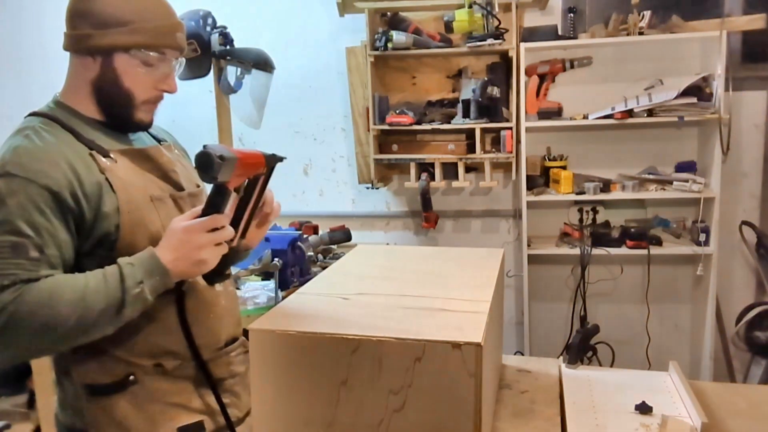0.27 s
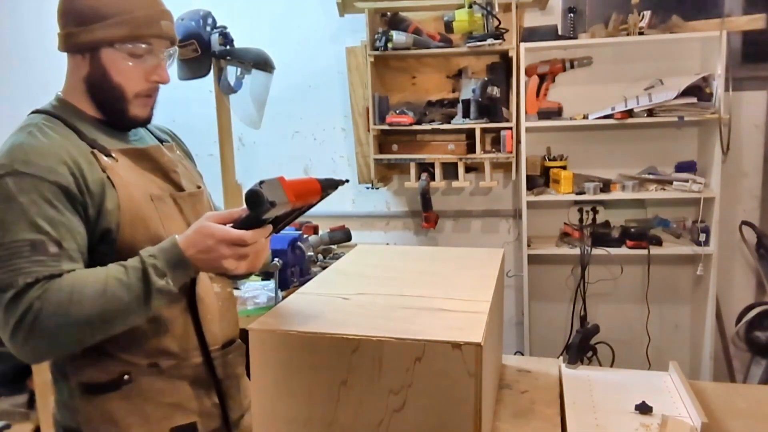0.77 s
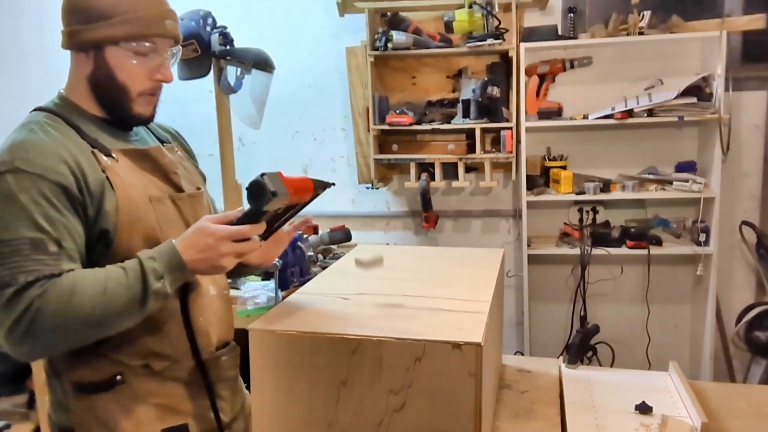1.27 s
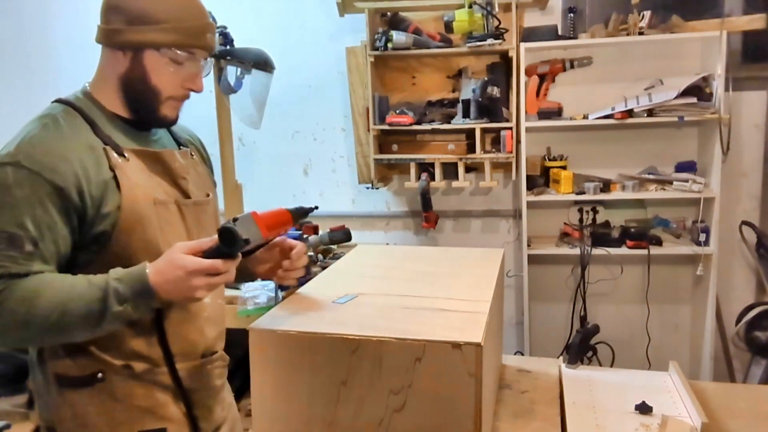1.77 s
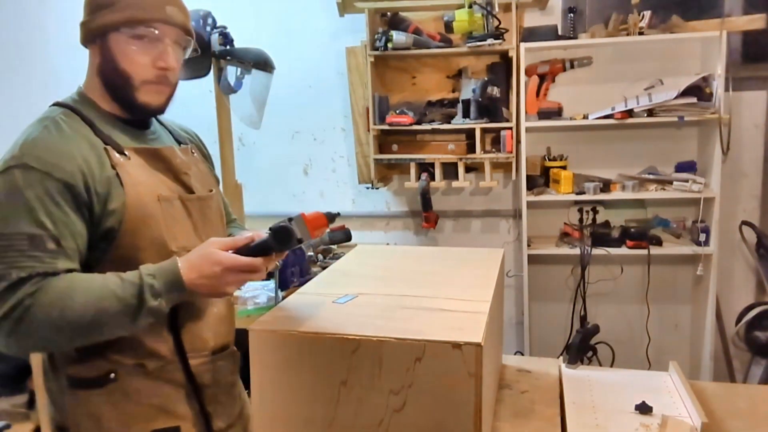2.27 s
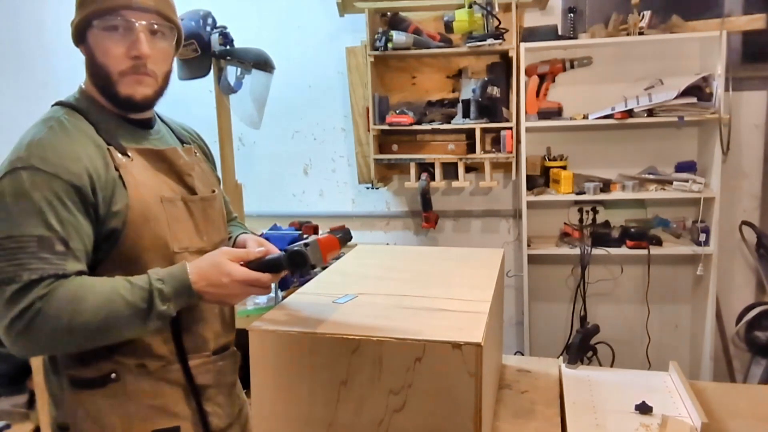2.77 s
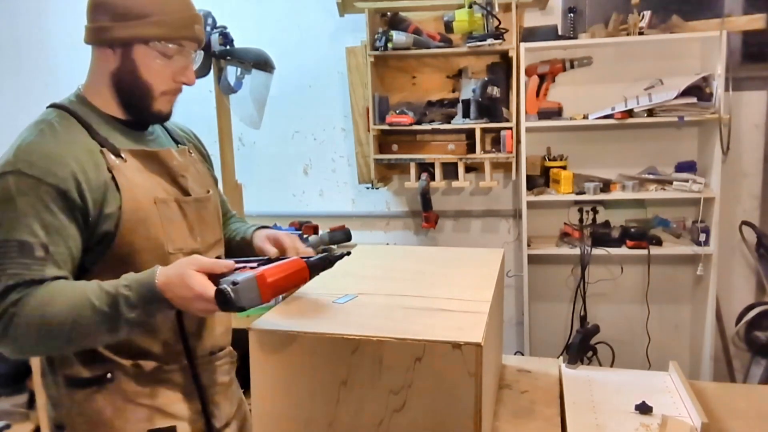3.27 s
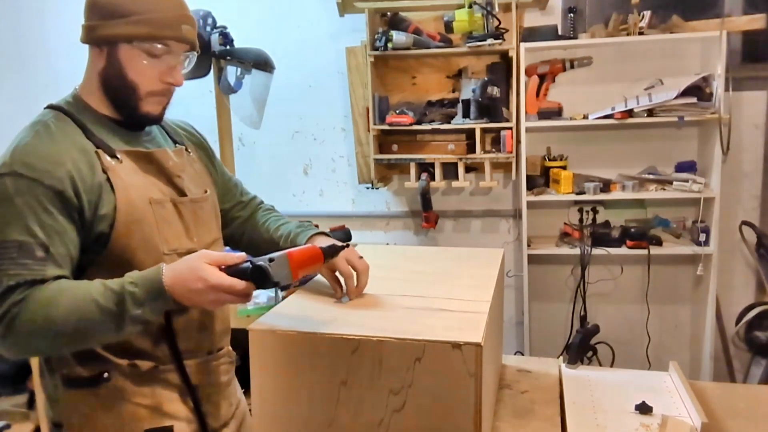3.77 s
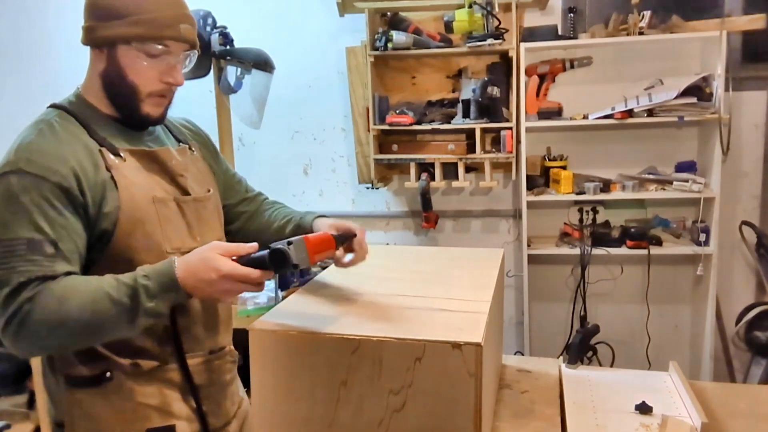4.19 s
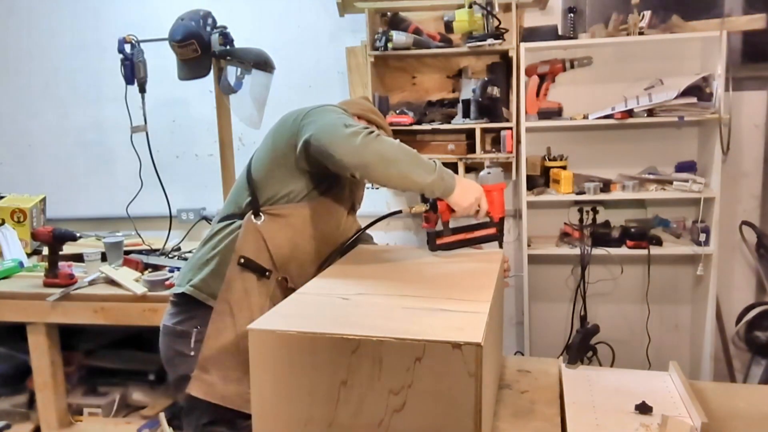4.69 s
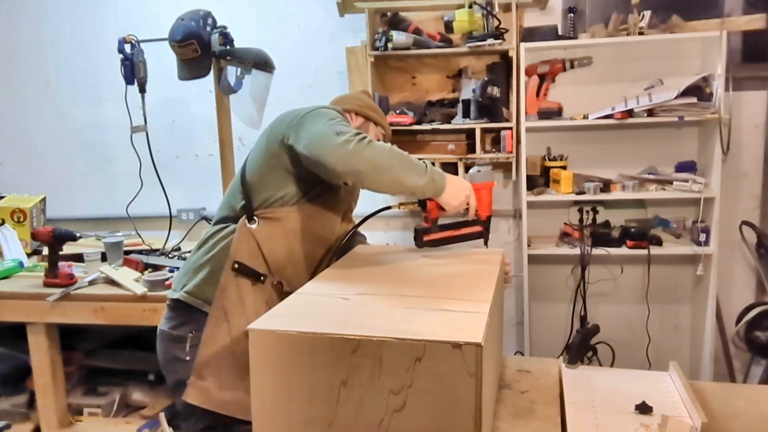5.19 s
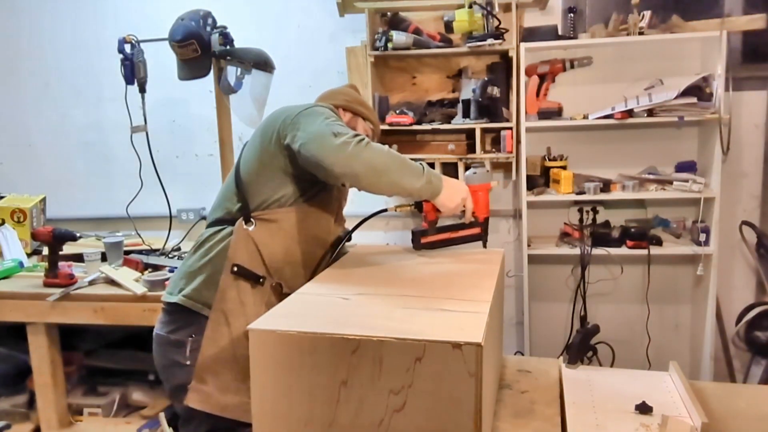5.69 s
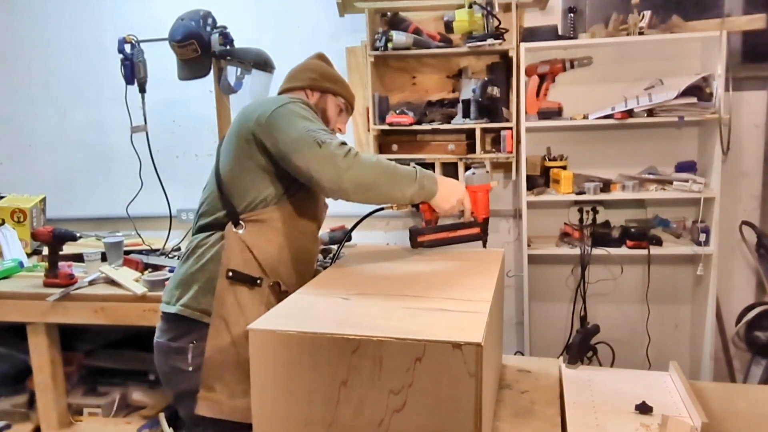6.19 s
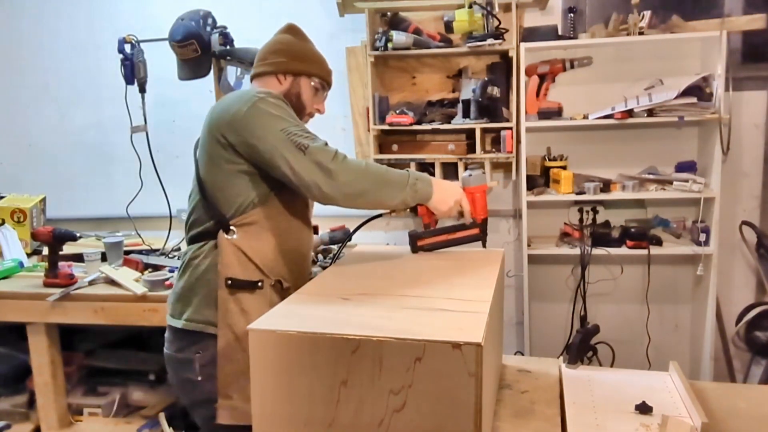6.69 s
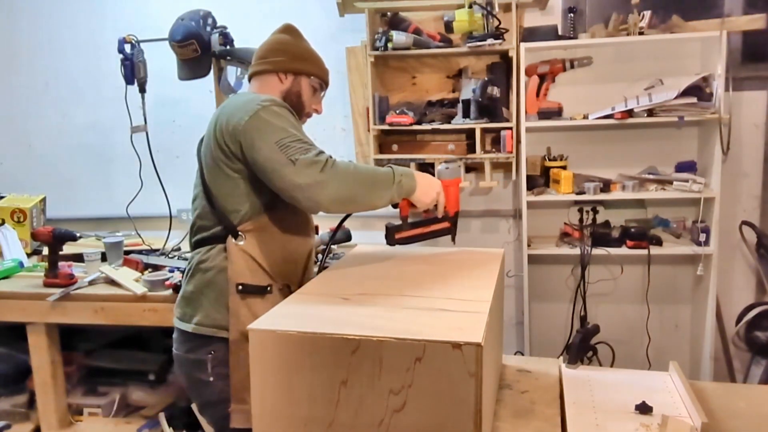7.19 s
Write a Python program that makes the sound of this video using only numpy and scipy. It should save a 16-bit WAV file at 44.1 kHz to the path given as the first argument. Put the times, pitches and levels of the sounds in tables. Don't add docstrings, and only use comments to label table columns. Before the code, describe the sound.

Low room tone in a hard, lively garage, heard through a nearby phone that flattens loud peaks and brings up the echo. At 0.25 s a steel latch snaps, with a tiny settling tick at 0.45. Around 0.8-1.0 a short scrape leads into a spring-driven magazine slam, a dense thin metallic rattle that rings. At 1.25 a nail strip drops on hollow plywood, jingling faintly and bouncing until 1.43. Soft finger taps from 2.2, then a rising scrape at 2.75-2.95 ends in a hard bright snap. Quiet hand and cloth rustles at 3.5-4.3. A nose tick at 4.45, a brief valve hiss, then a huge cracking blow at 4.5, recoil knocks, exhaust burst at 4.64 and boxy boom. Light knocks and rubbing at 5.2-6.0. A second, slightly weaker shot at 6.52 releases quicker, at 6.6. The tail fades to small contacts near 7.3.

```python
import sys
import numpy as np
from scipy import signal
from scipy.io import wavfile
from scipy.ndimage import uniform_filter1d

SR = 44100
rng = np.random.default_rng(int(sys.argv[2]) if len(sys.argv) > 2 else 0)


def attenuation_scalar(level_db):
    decades = np.asarray(level_db, float) / 20
    return 10 ** decades


def transcribe(u):
    v = np.clip(np.atleast_2d(u).T, -1, 1)
    q = np.round(v * 32767).astype(np.int16)
    wavfile.write(sys.argv[1], SR, q)


N = 328545

EDGES = np.geomspace(40, 16400, 19)
CENTRES = np.sqrt(EDGES[1:] * EDGES[:-1])

# (frequency [Hz], level [dB], t60 [s])
PUSHER_MODES = [(950, -8, 0.061), (1275, -5, .08), (1980, 2, 0.11), (2540, -4.5, .06), (3320, -5.5, 0.15),
                (3500, -14.5, .05), (4340, -2.5, 0.89)]
# (frequency [Hz], level [dB], t60 [s])
BOX_MODES = [(59, -10, 0.99), (160.4, 4, 0.2), (168.7, -2, 0.44), (206.1, -0.5, 0.19), (298, -10.5, 0.13),
             (385, -10, 0.043), (494.8, -4, 0.11), (560, 6, 0.17), (907, -8, 0.089)]
# (frequency [Hz], level [dB])
PISTON_COLOUR = [(45, -24.5), (70, -7), (110, -12.5), (180, -1), (300, -7.5), (560, 0.5), (1100, -4),
                 (2100, 7), (3200, 1), (5000, 3.5), (8000, -3), (15000, -4)]
# (piston blow [s], strength [dB], trigger held [s], exhaust spurt [dB])
SHOTS = [
    (4.498, -1, .145, -0.5),
    (6.518, -3.5, .088, -2.5),
]


def rms_one(x):
    return x / np.sqrt(np.mean(x ** 2) + 1e-20)


def at_hz(points, hz):
    points = np.array(points)
    return np.interp(np.log(hz), np.log(points[:, 0]), points[:, 1])


def band_filter(k):
    return signal.butter(2, EDGES[k:k + 2], "band", fs=SR, output="sos")


def bands(size):
    # (frequency [Hz], likeness [0-1])
    likeness = [(100, 0.98), (250, 0.94), (500, 0.71), (1000, 0.28), (4000, .05), (8000, 0.78),
                (14000, .25)]
    settle = 4000
    white = rng.standard_normal((2, 2, size + settle))
    out = []
    for k, hz in enumerate(CENTRES):
        mid, side = signal.sosfilt(band_filter(k), white[k % 2])[:, settle:]
        alike = np.clip(at_hz(likeness, hz), 0, 1)
        out.append(rms_one(np.sqrt(1 + alike) * mid + np.sqrt(1 - alike) * side * [[1], [-1]]))
    return np.array(out)


def toned(rows, body_db, weight_db=0, heavy_body=0):
    out = []
    for s, db, hard, *heavy in rows:
        heavy = sum(heavy)
        body = body_db - 0.38 * hard + heavy_body * heavy
        out.append((s, db, weight_db + heavy, body, hard))
    return out


def strike(events, hz, level_db):
    rows = np.array(events)
    at = np.round(rows[:, 0] * SR).astype(int)
    start, end = at[0], min(at[-1] + SR // 2, N)
    clicks = np.full(end - start, 1e-18)
    tone_db = [np.interp(np.log(hz), np.log([200, 800, 3000, 11000]), [bass, body, 0, treble])
               for bass, body, treble in rows[:, 2:]]
    clicks[at - start] = attenuation_scalar(rows[:, 1] + tone_db + level_db)
    return slice(start, end), clicks


def cracks(events, noise, colour, crack_db, click_db, crack_s, cycles, attack_s):
    out = np.zeros(N)
    for k, hz in enumerate(CENTRES):
        fall = attenuation_scalar(-60 / ((crack_s + cycles / hz) * SR))
        rise = np.exp(-1 / ((attack_s + 0.5 / hz) * SR))
        span, clicks = strike(events, hz, crack_db + at_hz(colour, hz))
        burst = signal.lfilter([1 - rise], np.convolve([1, -fall], [1, -rise]), clicks)
        out[span] += noise[k, span] * burst
        click = signal.sosfilt(band_filter(k), clicks)
        out[span] += (-1) ** k * attenuation_scalar(click_db) * np.sqrt(SR / hz) * click
    return out


def rings(events, modes, ring_db):
    out = np.zeros(N)
    luck_db = 2 * rng.standard_normal((len(events), len(modes)))
    for k, (hz, level_db, t60) in enumerate(modes):
        r = attenuation_scalar(-60 / (min(t60, .35) * SR))
        w = 2 * np.pi * hz / SR
        span, clicks = strike(events, hz, ring_db + level_db + luck_db[:, k])
        out[span] += signal.lfilter([.5, 0, -.5], [1, -2 * r * np.cos(w), r * r], clicks)
    return out


def movement(region):
    # (time [s], length [s], level [dB], brightness [0 dull - 2 bright])
    moves = [(0.01, 0.059, -54.5, 1.7), (1.798, 0.13, -59, 0.29), (3.507, 0.038, -50, 0.29),
             (3.611, 0.4, -56, 0.64), (3.967, 0.066, -48, 1.42), (4.054, 0.078, -54, 1.18),
             (4.194, 0.046, -62, 0.23), (4.34, 0.14, -62, 0.18), (5.498, 0.054, -68, 0.087),
             (5.649, 0.11, -47.5, 0.27), (5.783, .04, -54, .5), (5.871, .06, -56.5, 0.084),
             (6.031, 0.045, -61, 0.076), (6.35, 0.085, -57, .3), (6.461, .02, -57, 0.98),
             (7.199, .02, -56, 0.58), (7.31, 0.064, -51.5, .7)]
    t, out = np.arange(N) / SR, np.zeros(N)
    for s, length, db, bright in moves:
        rise_db = 700 * np.maximum(s - t, 0)
        fall_db = 401 * np.maximum(t - s - length, 0)
        out += attenuation_scalar(db - 20 * abs(region - bright) - rise_db - fall_db)
    return out


def background(noise):
    # (frequency [Hz], density [dB per Hz])
    room_tone = [(24, -33), (40, 3), (81, 4.5), (320, -7), (585, -1.5), (1020, -9.5), (2570, -9.5),
                 (6330, -21), (7930, -23.5), (14800, -28.5), (16000, -36)]
    # (frequency [Hz], width [Hz], level [dB])
    rubbed = [(202, 25, -2.5), (575.7, 40, 5.5), (1130, 40, -15), (1900, 59, -10), (2540, 450, -5)]
    floor = np.tensordot(attenuation_scalar(at_hz(room_tone, CENTRES)) * np.sqrt(CENTRES), noise, 1)
    rustle = 0
    for region, (hz, octaves) in enumerate([(176, 0.79), (1370, 0.52), (3300, 2.3)]):
        shape = np.exp(-.5 * (np.log2(CENTRES / hz) / octaves) ** 2)
        rustle += movement(region) * rms_one(np.tensordot(shape, noise, 1))
    hollows = 0
    for hz, width, level_db in rubbed:
        hollows += attenuation_scalar(level_db) * signal.lfilter(*signal.iirpeak(hz, hz / width, SR), rustle)
    return attenuation_scalar(-66) * rms_one(floor) + 0.6 * rustle + 2.1 * hollows


def latch(noise):
    # (time [s], peak [dB], hardness [dB])
    contacts = [
        (0.2245, -29.5, -10.5),
        (0.2513, -11.5, -6),
        (0.4473, -30, -5),
    ]
    # (frequency [Hz], level [dB], t60 [s])
    plate_modes = [(1350, -4, .08), (2600, -6, .08), (3310, -10, .06), (4300, -5, .08), (4790, -8, .06),
                   (5850, -4, .1), (5960, -1, .1), (6430, -8, .06), (7420, -8, .08)]
    # (frequency [Hz], level [dB])
    plate_colour = [(60, -14), (400, -7), (700, -16), (1200, 4), (1800, -3.5), (2600, -5), (4500, -0.5),
                    (6000, -2), (8000, -1), (15000, 1)]
    hits = toned(contacts, body_db=-20, weight_db=-43.5)
    crack = cracks(hits, noise, plate_colour, crack_db=-12.5, click_db=5, crack_s=.03, cycles=5.6, attack_s=0.0033)
    return crack + rings(hits, plate_modes, ring_db=-18.5)


def slides(noise):
    # (time [s], level [dB], channel resonance [Hz])
    slide_paths = [
        [(0.79, -58, 1900), (0.862, -42.5, 1847), (0.876, -42.5, 1814)],
        [(2.735, -58, 700), (2.76, -45.5, 800), (2.8, -46.5, 1048), (2.835, -37, 1349), (2.9, -40.5, 1900),
         (2.964, -45.5, 2094)],
    ]
    # (frequency [Hz], level [dB per half octave])
    rail_colour = [(200, -57), (500, -2), (1000, 9.5), (2000, 14), (5000, 17), (7500, 8), (15000, 4)]
    t = np.arange(N) / SR
    level = 0
    for path in slide_paths:
        path = np.array(path)
        level = level + attenuation_scalar(np.interp(t, path[:, 0], path[:, 1], -200, -200))
    catches = (rng.random(N) < 300 / SR) * rng.exponential(1, N)
    rough = 1 + 0.48 * signal.lfilter([1], [1, -.985], catches)
    rows = np.concatenate(slide_paths)
    phase = 2 * np.pi * np.cumsum(np.interp(t, rows[:, 0], rows[:, 2])) / SR
    wobble = signal.lfilter(*signal.butter(2, 110, fs=SR), rng.standard_normal((2, N)))
    channel = rms_one(wobble[0] * np.cos(phase) + wobble[1] * np.cos(1.55 * phase))
    scrape = rms_one(attenuation_scalar(at_hz(rail_colour, CENTRES)) @ noise)
    return attenuation_scalar(-7.5) * level * rms_one(rough) * (scrape + 1.1 * channel)


def magazine(noise):
    # (time [s], peak [dB], hardness [dB], weight [dB])
    contacts = [
        (.7955, -53, -22, -21),
        (.8835, -16, -10, -8),
        (.8915, -6, -8, -8),
        (.8985, -4, -9, -8),
        (.9240, -6, -3, -4),
        (.9455, -6, -6, 5),
        (.9700, -4, -5, 5),
        (.9745, -7, -6, 4),
        (.9900, -12, 0, 4),
        (1.0075, -7, -5, 4),
    ]
    # (frequency [Hz], level [dB])
    spring_colour = [(60, -21), (300, -5), (550, -7), (900, 1.5), (2200, 3.5), (4500, -1), (6500, 8.5),
                     (8000, -4), (15000, 6.5)]
    hits = toned(contacts, body_db=-9.5, weight_db=-34.5, heavy_body=0.91)
    crack = cracks(hits, noise, spring_colour, crack_db=-10, click_db=0, crack_s=0.014, cycles=1.5, attack_s=0.00072)
    thin = signal.butter(4, 290, "high", fs=SR, output="sos")
    return signal.sosfilt(thin, crack) + rings(hits, PUSHER_MODES, ring_db=-25)


def nail_strip(noise):
    # (time [s], peak [dB], hardness [dB], weight [dB])
    contacts = [
        (1.249, -18.5, -42, -2.5),
        (1.262, -23, -40.5, 6.5),
        (1.335, -28.5, -24, 18.5),
        (1.385, -23.5, -12.5, 5.5),
    ]
    # (frequency [Hz], level [dB])
    lid_colour = [(45, -23), (70, -21.5), (110, -25), (170, 2.5), (600, 2.5), (1400, 5), (2600, 6.5),
                  (3400, -4.5), (4500, -2.5), (15000, 0)]
    # (time [s], peak [dB], hardness [dB])
    jingles = [
        (1.2500, -32.5, -0.5),
        (1.296, -45.5, 4),
        (1.385, -38.5, 1),
        (1.43, -38.5, -4),
    ]
    # (frequency [Hz], level [dB], t60 [s])
    nail_modes = [(7430, 0, .1), (7560, -2, .1), (8450, -5, .08), (8620, -6, .08)]
    hits = toned(contacts, body_db=-5.5)
    crack = cracks(hits, noise, lid_colour, crack_db=-8, click_db=-20, crack_s=0.033, cycles=12, attack_s=0.0015)
    jingle = rings(toned(jingles, body_db=0), nail_modes, ring_db=-5.5)
    return crack + rings(hits, BOX_MODES, ring_db=-21) + jingle


def taps(noise):
    # (time [s], peak [dB], hardness [dB], weight [dB])
    contacts = [
        (2.1833, -45, -46, 0),
        (2.219, -35, -39, 0.5),
        (2.235, -35.5, -42, -1),
        (2.2532, -24, -10, 4),
        (2.376, -33.5, -30.5, 0),
        (2.5615, -32, -13.5, 19.5),
        (2.7227, -34, -40, 1.5),
        (2.904, -25.5, -4, -13),
        (2.9739, -12.5, 0, 10),
        (2.9747, -6, 6.5, -19.5),
    ]
    # (frequency [Hz], level [dB])
    pusher_colour = [(60, -15.5), (300, 0.5), (600, 10), (1000, 2.5), (1900, 9), (3000, 5), (5500, 8),
                     (8000, 4), (15000, 3.5)]
    hits = toned(contacts, body_db=-16, weight_db=-44.5, heavy_body=1)
    crack = cracks(hits, noise, pusher_colour, crack_db=-19, click_db=10.5, crack_s=0.011, cycles=2.7,
                   attack_s=0.00014)
    return crack + rings(hits, PUSHER_MODES, ring_db=-27.5)


def nose(noise):
    # (time [s], peak [dB], hardness [dB], weight [dB])
    contacts = [(3.4989, -53.5, -13, 15.5), (4.1964, -48, -23.5, -0.5), (4.4535, -23.5, 17.5, -8.5),
                (5.1831, -32.5, 6.5, -9.5), (5.3218, -33.5, -23, 15.5), (5.384, -32.5, 7, 4.5),
                (5.779, -37, -16, 0), (5.8951, -54, -24, 3), (6.0166, -56.5, -16, 19),
                (6.4617, -39, 21.5, -1), (6.4724, -43.5, 3.5, -7), (7.2825, -34.5, -32, -17),
                (7.3008, -27.5, -1, -8.5)]
    # (frequency [Hz], level [dB])
    wood_colour = [(45, -6.5), (70, -5.5), (110, -7.5), (180, 1), (300, -15.5), (600, 2.5), (2200, 10.5),
                   (5000, 1.5), (8000, -6), (11000, -2.5), (15000, -4.5)]
    hits = toned(contacts, body_db=-10.5, heavy_body=0.1)
    crack = cracks(hits, noise, wood_colour, crack_db=-14, click_db=-0.5, crack_s=0.005, cycles=9.6, attack_s=0.0051)
    return crack + rings(hits, BOX_MODES, ring_db=-21.5)


def jets(noise):
    # (frequency [Hz], level [dB per half octave])
    jet_colour = [(200, -25), (1000, -10), (2500, -13), (5000, -9), (8000, 8), (12000, -4.5), (15500, 25)]
    t, flow = np.arange(N) / SR, np.zeros(N)
    for s, _, held, spurt_db in SHOTS:
        # (opens [s], attack [s], peak [dB], fall [dB per s])
        puffs = [(s - .029, 0.012, -20.5 + spurt_db / 2, 1800),
                 (s, 0.0073, -22.5, 299.5),
                 (s + held, .008, -8 + spurt_db, 1100),
                 (s + held, .045, -18.5 - spurt_db, 340)]
        for opens, attack, peak_db, fall in puffs:
            since = t - opens
            fall_db = fall * np.maximum(since - attack, 0)
            flow += np.clip(since / attack, 0, 1) ** 3 * attenuation_scalar(peak_db - fall_db)
    return flow * rms_one(attenuation_scalar(at_hz(jet_colour, CENTRES)) @ noise)


def blows(noise):
    # (time after the blow [s], level [dB], hardness [dB], weight [dB])
    stroke = [
        (0, -8, -19.5, -9),
        (.015, -2, -6, 0),
        (.037, -12, -9.5, -3),
    ]
    # (share of the hold [0-1], level [dB], hardness [dB], weight [dB])
    recoil = [
        (.62, -3.5, -12, -7.5),
        (.85, -11.5, -14.5, -10),
    ]
    # (time after release [s], level [dB], hardness [dB], weight [dB])
    settle = [
        (.03, -22.5, -11, 2),
        (.058, -14.5, -14, 3),
    ]
    # (frequency [Hz], level [dB], t60 [s])
    cylinder_modes = [(1550, -1.5, 0.017), (1955, 5.5, 0.052), (1970, -5, .05), (2410, -2, 0.058),
                      (2560, 1.5, .05), (4255, -1.5, .04)]
    contacts, thumps = [], []
    for s, shot_db, held, _ in SHOTS:
        for rows, start, scale in [(stroke, s, 1), (recoil, s, held), (settle, s + held, 1)]:
            contacts += [(start + scale * after, shot_db + db, hard, heavy) for after, db, hard, heavy in rows]
        thumps.append((s + held + 0.05, shot_db, 0))
    hits = toned(contacts, body_db=-8, heavy_body=.3)
    crack = cracks(hits, noise, PISTON_COLOUR, crack_db=-9, click_db=5, crack_s=0.05, cycles=2.6, attack_s=0.0034)
    ring = rings(hits, BOX_MODES + cylinder_modes, ring_db=-19)
    rocking = rings(toned(thumps, body_db=0), BOX_MODES[:1], ring_db=-17.5)
    return crack + ring + rocking


def driver(noise):
    hits = toned([(s + 0.003, db - 14, 7.5) for s, db, *_ in SHOTS], body_db=-12.5, weight_db=-30)
    return cracks(hits, noise, PISTON_COLOUR, crack_db=-9, click_db=3, crack_s=0.0057, cycles=5, attack_s=0.0003)


def garage(dry, wet_db, gap_s, rise_s):
    # (frequency [Hz], t60 [s])
    garage_t60 = [(60, 0.6), (170, 0.58), (500, 0.67), (1400, 0.77), (3000, 0.71), (5500, 0.62),
                  (8000, 0.39), (12000, 0.33)]
    # (frequency [Hz], level [dB])
    echo_colour = [(47, -8), (66, 2), (180, 0.5), (290, -4), (420, -1.5), (600, 1), (1200, 0.5)]
    moved_s = [0, .7, 1.2, 2.1, 2.7, 4.3, 5.1, 6.3, 7.1]
    t = np.arange(SR) / SR
    t60 = at_hz(garage_t60, CENTRES)[:, None, None]
    fall = attenuation_scalar(-60 * t / t60) * np.sqrt(CENTRES / 3000)[:, None, None]
    build_up = 1 - np.exp(-np.maximum(t - gap_s, 0) / rise_s)
    shape = build_up * (1 + 0.71 * np.exp(-t / 0.027))
    direct = np.array([np.roll(dry, shift=3), dry])
    out = np.pad(direct, ((0, 0), (0, SR)))
    marks = [int(s * SR) for s in moved_s] + [N]
    for start, end in zip(marks, marks[1:]):
        tail = np.tensordot(attenuation_scalar(at_hz(echo_colour, CENTRES)), bands(size=SR) * fall, 1) * shape
        tail *= attenuation_scalar(wet_db) / np.sqrt(np.sum(tail ** 2) / 2)
        out[:, start:end + SR - 1] += signal.fftconvolve(dry[None, start:end], tail, axes=1)
    return out[:, :N]


def scene():
    noise = bands(size=N)
    near = noise[:, 0]
    loading = latch(near) + slides(near) + magazine(near) + nail_strip(near) + taps(near)
    shooting = nose(near) + jets(near) + blows(near) + driver(near)
    room = garage(loading + shooting, wet_db=3.5, gap_s=0.00042, rise_s=0.0017)
    return background(noise[:, :, ::-1]) + room


def low_pass(x):
    return signal.sosfilt(signal.butter(12, 16800, fs=SR, output="sos"), x)


def record(dry):
    x = signal.sosfilt(signal.butter(4, 54, "high", fs=SR, output="sos"), dry)
    x = signal.lfilter(*signal.iirnotch(8050, 22.0, SR), x)
    level_db = 10 * np.log10(uniform_filter1d(np.mean(x ** 2, 0), size=900) + 1e-12)
    ramp = 160 * np.arange(N) / SR
    held_db = np.maximum.accumulate(level_db + ramp) - ramp
    over_db = np.maximum(held_db + 13.5, 0)
    x = np.clip(x * attenuation_scalar(-.9 * uniform_filter1d(over_db, size=300)), -.95, .95)
    mix = signal.sosfilt(signal.cheby2(10, 50, 16500, fs=SR, output="sos"), x)
    return low_pass(mix)


dry = scene()
out = record(dry)
transcribe(out)
```